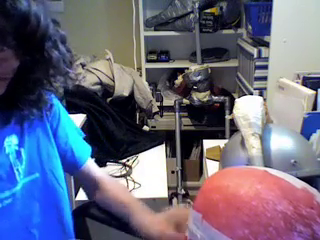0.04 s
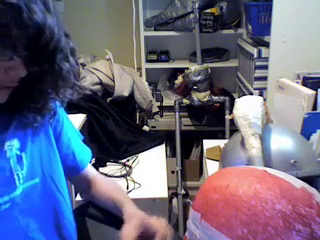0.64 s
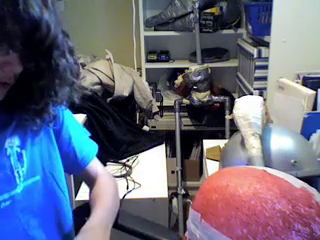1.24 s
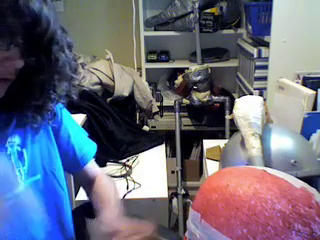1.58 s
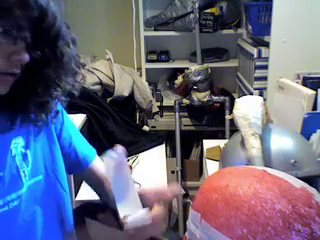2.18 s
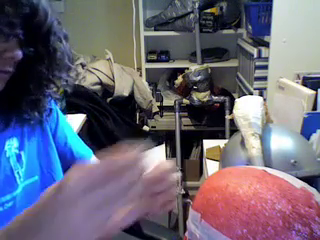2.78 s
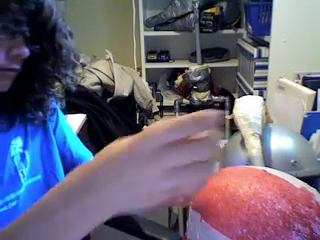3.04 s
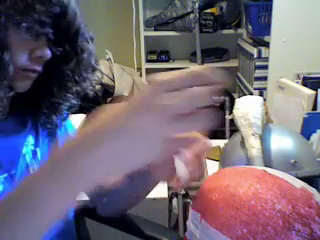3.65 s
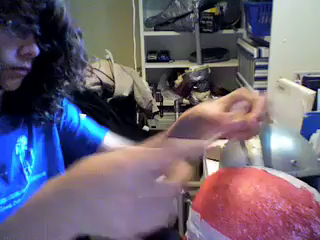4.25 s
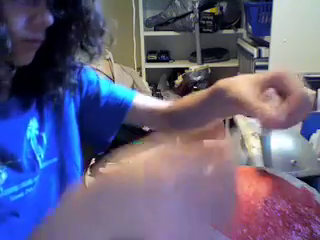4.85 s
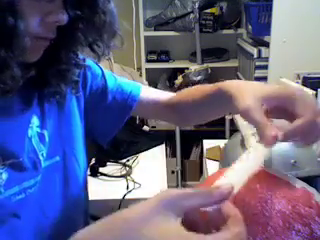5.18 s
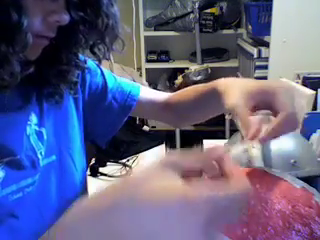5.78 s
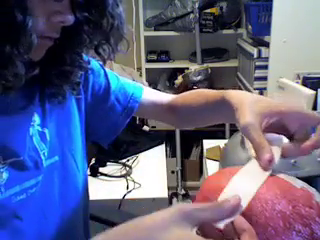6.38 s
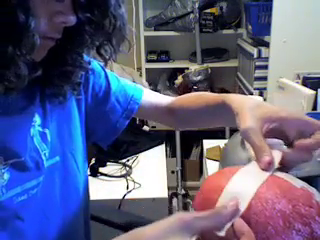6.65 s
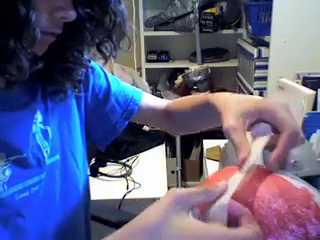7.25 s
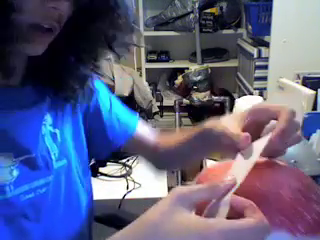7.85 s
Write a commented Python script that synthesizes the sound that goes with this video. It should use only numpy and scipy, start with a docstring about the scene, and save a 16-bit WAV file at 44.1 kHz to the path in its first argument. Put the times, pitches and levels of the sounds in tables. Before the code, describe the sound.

Short crackly rips of masking tape, a double knock on a desk, then soft paper rustling and dull bumps over faint hum.

```python
"""Masking tape for a tape ball

Tape crackles and squeals off its roll as the glue lets go, and is torn. The roll knocks twice on a desk,
which rings. The strip rustles as it is handled and pressed onto a large taped ball, which thumps softly.
The small room has a mains hum; the computer microphone hisses and adds a faint pulsing whine."""
import sys
import numpy as np
from scipy import signal
from scipy.fft import rfft, irfft
from scipy.io import wavfile
from scipy.ndimage import uniform_filter1d

SR = 44100
rng = np.random.default_rng(int(sys.argv[2]) if len(sys.argv) > 2 else 0)


def inscribe(sig):
    """Save sig as 16-bit PCM at rate SR to the path in sys.argv[1].

    A 1-D sig is mono; a 2-D sig holds one channel per row.
    Samples are clipped to [-1, 1] before scaling.
    """
    pcm = np.round(np.clip(np.atleast_2d(sig).T, -1, 1) * 32767)
    wavfile.write(sys.argv[1], SR, pcm.astype(np.int16))


N = 353285
TIME = np.arange(N) / SR


def amp(db):
    """Turns decibels into a number to multiply by."""
    return 10 ** (np.asarray(db) / 20)


def evened(x):
    """Scales a signal to an average strength (rms) of 1."""
    return x / np.sqrt(np.mean(x ** 2) + 1e-20)


def read(points, hz):
    """Reads between (frequency, value) points, on a scale of octaves."""
    f, value = np.transpose(points)
    return np.interp(np.log(hz + 1), np.log(f + 1), value)


def add(mix, s, sound):
    """Mixes a sound in at s seconds."""
    part = mix[..., max(round(s * SR), 0):][..., :sound.shape[-1]]
    part += sound[..., :part.shape[-1]]


def coloured_click(points, size=4096):
    """A click with the given tone colour and an energy of 1, packed at its start (minimum phase)."""
    log_gain = np.log(amp(read(points, abs(np.fft.fftfreq(size, 1 / SR)))))
    response = np.fft.ifft(np.exp(np.conj(signal.hilbert(log_gain)))).real[:size // 2]
    return response / np.linalg.norm(response)


def soften(x, hz):
    """Turns down everything above hz."""
    return signal.sosfilt(signal.butter(2, min(hz, SR / 3), fs=SR, output="sos"), x)


def waver(hz, size=N):
    """A smooth random curve that moves up to about hz times a second."""
    return evened(soften(rng.standard_normal(size), hz))


def flutter(hz, depth_db):
    """A volume that wavers at random."""
    return evened(amp(depth_db * waver(hz)))


def crackle(per_s, spread_db):
    """Tiny random clicks of unequal size."""
    size = amp(spread_db * np.minimum(rng.exponential(1, N), 4))
    return evened(size * rng.choice([-1, 1], N) * (rng.random(N) < per_s / SR))


def ringing_noise(hz, width_hz, size=N):
    """A wavering ring around one pitch."""
    wander = soften(rng.standard_normal(size) + 1j * rng.standard_normal(size), width_hz / 2)
    return evened((wander * np.exp(2j * np.pi * hz * TIME[:size])).real)


def background(air_db=-52.5, frames_per_s=14.98, on_share=0.41):
    """Room air, mains hum, and a slightly unsteady whine that pulses with every camera frame."""
    # tone colour of room air and microphone hiss: (frequency [Hz], relative level [dB])
    air_colour = [(20, -16), (38, 1), (55, -26), (100, 2.5), (200, 3), (400, 1.5), (1000, -3), (2000, -9.5),
                  (3600, -20.5), (4600, -22.5), (6300, -18), (8500, -21.5), (12000, -23.5), (15200, -31)]
    # hum of the mains power: (frequency [Hz], level [dB])
    hum_tones = [(59.6, -61), (119.7, -53), (239.5, -70.5)]
    # whine of the electronics: (frequency [Hz], level while on [dB], share that pulses [0-1])
    whine_tones = [(8000, -61, .97), (12947, -81, .9), (11052, -87, .5), (15250, -84, .1)]
    air_gain = amp(read(air_colour, np.fft.rfftfreq(N, 1 / SR)))
    air = amp(air_db) * evened(irfft(rfft(rng.standard_normal(N)) * air_gain, N))
    hum = sum(amp(db) * np.sqrt(2) * np.sin(2 * np.pi * (hz * TIME + rng.random()))
              for hz, db in hum_tones)
    frame = (TIME - .0271) * frames_per_s
    is_on = abs((frame + .5) % 1 - .5) < on_share / 2
    gate = uniform_filter1d(1. * is_on, size=60)
    drift = .2 * waver(7)
    whine = sum(amp(db) * np.sqrt(2) * (1 - share * (1 - gate)) * np.sin(2 * np.pi * hz * TIME + drift)
                for hz, db, share in whine_tones)
    return air * flutter(hz=2.7, depth_db=0.23) + hum * flutter(hz=1.9, depth_db=0.86) + whine


def room(x, echo_db, first_echo_s=0.00407):
    """The walls add a blur of echoes, in which each pitch dies away at its own speed."""
    # how long the room rings: (frequency [Hz], time to fade by 60 dB [s])
    fade_times = [(100, 0.21), (500, 0.29), (1500, 0.31), (6000, 0.24), (10000, 0.23), (15000, 0.13)]
    t = TIME[:SR // 2]
    echoes = rng.standard_normal(len(t)) * (t > first_echo_s)
    hz, when, bands = signal.stft(echoes, SR, nperseg=256)
    fade = amp(-60 * when / read(fade_times, hz)[:, None])
    tail = signal.istft(bands * fade, SR, nperseg=256)[1]
    return x + amp(echo_db) * signal.fftconvolve(x, tail / np.linalg.norm(tail))[:N]


def widen(mid):
    """Makes stereo: left and right differ a little, mostly in the treble."""
    # stereo width: (frequency [Hz], side level compared with the middle [dB])
    width = [(100, -68), (1200, -65), (2800, -52), (5600, -15), (10000, -9), (14000, -6.5)]
    hz = np.fft.rfftfreq(N, 1 / SR)
    knots = np.linspace(0, SR / 2, num=500)
    phase = .9 * np.interp(hz, knots, rng.standard_normal(len(knots))) - np.pi / 2
    side = irfft(rfft(mid) * amp(read(width, hz)) * np.exp(1j * phase), N)
    return np.array([mid + side, mid - side])


def thumps():
    """Hands bump the ball and the roll; such soft pushes ring only their lowest tones."""
    # the bumps: (time [s], peak level [dB], length of the push [s])
    bumps = [(0.113, -49, 0.0048), (0.223, -32, 0.002), (0.466, -41, 0.0048), (0.642, -35, 0.0032),
             (0.671, -30.5, 0.0012), (0.85, -45, 0.0029), (6.665, -40.5, 0.0044), (7.184, -41, 0.0047),
             (7.435, -30, 0.0041), (7.683, -39.5, 0.0049), (7.858, -25.5, 0.0013)]
    # their hollow boom: (frequency [Hz], relative level [dB], time to fade by 60 dB [s])
    boom_tones = [(62.6, -16, 0.18), (96, -4.5, 0.21), (148.6, 3.5, 0.47), (168, -33, 0.26),
                  (266, -1, 0.115), (322, -15, 0.13)]
    out, t = np.zeros(N), TIME[:SR // 2]
    boom = sum(amp(db - 60 * t / fade_s) * np.cos(2 * np.pi * hz * t) for hz, db, fade_s in boom_tones)
    for s, db, push_s in bumps:
        thump = signal.fftconvolve(boom, t * np.exp(-4 * t / push_s))[:len(t)]
        add(out, s, amp(db) * thump / abs(thump).max())
    return out


def wobble():
    """The cardboard roll wobbles on its rim between the two knocks."""
    # loudness of the rolling rim: (time [s], level [dB])
    loudness = [(2.1, -41), (2.135, -61), (2.165, -40), (2.19, -49), (2.21, -69)]
    s, db = np.transpose(loudness)
    return ringing_noise(hz=850, width_hz=450) * np.interp(TIME, s, amp(db), left=0, right=0)


def band_gains(body_db, sizzle_db):
    """Gains for paper(): the low body and the high sizzle, each compared with the middle band."""
    return amp([[body_db], [0], [sizzle_db]])


def paper(clicks, body_hz=3700, sizzle_hz=9000, size=2048):
    """Three rows of clicks sound the paper's low body, its middle crackle and its high sizzle."""
    # tone colour of crackling paper: (frequency [Hz], relative level [dB])
    paper_colour = [(60, -29), (140, 2), (220, -25.5), (350, -7), (600, -7.5), (1150, -4.5), (1700, -7.5),
                    (2400, -7.5), (3500, -10), (4500, -2.5), (5700, 6), (7500, -1), (11000, -18.5),
                    (15500, -29.5)]
    hz = np.fft.rfftfreq(2 * size, 1 / SR)
    body = 1 / (1 + (hz / body_hz) ** 10)
    sizzle = 1 / (1 + (sizzle_hz / (hz + 1)) ** 10)
    colour = rfft(np.pad(coloured_click(paper_colour), (size, 0)))
    bands = irfft(colour * np.array([body, 1 - body - sizzle, sizzle]))
    bands /= np.linalg.norm(bands, axis=1, keepdims=True)
    return signal.oaconvolve(clicks, bands, axes=1).sum(0)[size:size + N]


def knocks(ring_db=-19.5, blow_db=9, clatter_db=2, clatter_s=0.014, tick_s=0.0017):
    """The roll hits the desk with a tick and a brief clatter; where it lands shapes the desk's ring."""
    # the roll lands: (time [s], force [dB], hardness as a treble limit [Hz], place on the desk [0-1],
    # tick level [dB], crack of the rim compared with the tick [dB])
    landings = [(2.0542, 3, 1010, 0.12, -26, 1), (2.2108, -10, 1270, 0.15, -38, 14),
                (2.2132, 3.5, 2050, 0.2, -25.5, 13)]
    # first echoes from nearby surfaces: (delay [s], relative level [dB])
    echoes = [(.0024, -17), (.0049, -7), (.0075, -3), (0.0107, -8), (0.015, -27), (0.024, -20),
              (.0275, -11), (.031, -20)]
    # dull clunk of roll and desk top: (frequency [Hz], relative level [dB])
    clunk_colour = [(30, -38), (60, -5), (130, -11), (195, -4), (280, 3.5), (900, 2.5), (1500, -1),
                    (1850, -7), (2150, -18), (3100, -14), (4200, -23), (9000, -34)]
    # the desk's own tones: (frequency [Hz], relative level [dB], time to fade by 60 dB [s])
    desk_tones = [(57.5, -21, 0.26), (92, -7, 0.15), (141, -3, 0.22), (164, -9, 0.28), (248.7, -15.5, 0.33),
                  (296.5, -1.5, 0.14), (334, -7.5, 0.21), (400.7, -0.5, 0.15), (425.5, -4.5, 0.11),
                  (553.4, -5, 0.11), (654, 2, 0.11), (705, 4.5, 0.061), (830, 3, 0.064), (907, -4, 0.13),
                  (964, -9, 0.16), (1010, -2, 0.091), (1090, -1.5, 0.11), (1270, -13, 0.083),
                  (1550, -20, 0.077), (1650, -10, 0.046), (1903, -8, .07), (2940, 1.5, 0.022)]
    out, ticks, t = np.zeros(N), np.zeros((3, N)), TIME[:SR // 2]
    blow = np.zeros(len(t))
    for delay, db in [(0, 0), *echoes]:
        add(blow, delay, np.array([-amp(blow_db + db)]))
    clatter = rng.standard_normal(len(t)) * np.exp(-t / clatter_s)
    force = blow + amp(clatter_db) * clatter / np.linalg.norm(clatter)
    clunk = signal.fftconvolve(force, coloured_click(clunk_colour))[:len(t)]
    tones = np.array([amp(db - 60 * t / fade_s) * np.sin(2 * np.pi * hz * t)
                      for hz, db, fade_s in desk_tones])
    index = np.arange(len(desk_tones))
    for s, db, hard_hz, place, tick_db, crack_db in landings:
        weights = (-1) ** index * (1 + 0.41 * np.cos(2 * np.pi * index * place))
        add(out, s, amp(db) * soften(clunk + amp(ring_db) * weights @ tones, hard_hz))
        tick = rng.choice([-1, 1], len(t)) * np.exp(-t / tick_s)
        add(ticks, s, amp(tick_db) * band_gains(crack_db, sizzle_db=-15) * tick)
    return out + paper(ticks)


def rustle(grip_db=-78, crinkle_db=-7.5, rise_share=0.28, fade_share=0.67):
    """Sliding fingers rub a soft, grainy swish out of the crepe paper and set off small crinkles."""
    # finger strokes along the strip: (start [s], length [s], level [dB])
    strokes = [(0.01, 0.54, -52.5), (.7, 0.29, -64.5), (0.876, 0.11, -48), (1.109, 0.028, -53.5),
               (1.367, 0.21, -57.5), (1.613, 0.16, -49), (1.712, 0.42, -58), (2.034, 0.27, -55),
               (2.51, 0.1, -57), (2.608, 0.13, -50.5), (2.725, 0.18, -58.5), (2.874, 0.31, -64),
               (3.064, 0.26, -62), (3.282, 0.43, -68.5), (3.567, 0.29, -65.5), (3.857, 0.31, -63.5),
               (4.04, 0.29, -58.5), (4.315, 0.088, -52.5), (4.683, 0.78, -68.5), (4.956, 0.14, -49.5),
               (5.12, .07, -57), (5.324, 0.061, -50), (5.827, 0.13, -57.5), (6.628, 0.14, -62),
               (7.088, 0.16, -47), (7.185, .22, -54), (7.415, 0.15, -56), (7.573, 0.093, -54.5),
               (7.809, 0.15, -54.5)]
    rub = np.full(N, amp(grip_db))  # the held strip never quite rests
    for s, length, db in strokes:
        progress = np.arange(0, 1, 1 / (length * SR))
        swell = np.minimum(progress / rise_share, (1 - progress) / fade_share)
        add(rub, s, amp(db) * np.clip(swell, 0, 1))
    swish = band_gains(body_db=-7, sizzle_db=-9) * crackle(per_s=6000, spread_db=2.5)
    swish *= flutter(hz=50, depth_db=2.0)
    crinkles = band_gains(body_db=-3, sizzle_db=-9) * crackle(per_s=45, spread_db=2.5)
    return rub * (swish + amp(crinkle_db) * crinkles)


def snaps(rise_s=0.0013, echo_db=-16, echo_s=0.021, lowest_hz=560):
    """Each snap is a quick cluster of tiny breaks, its sound scattered by the hands and desk."""
    # creases snap and glue lets go: (time [s], level [dB], relative body [dB], relative sizzle [dB])
    breaks = [(0.0732, -41.5, -11, -27), (.1631, -19.5, -11, -15), (0.2341, -31, 9.5, -14),
              (0.393, -50.5, 7, -19), (0.556, -43, -22, -14), (0.596, -40, 7, -11), (0.643, -43, -4, -6),
              (.681, -48, -13, -15), (0.943, -36, -1.5, -17), (1.277, -41, -12, -34),
              (1.641, -42, -3.5, -25), (1.6734, -15.5, -20.5, -30), (1.6862, -28, -20, -21),
              (1.935, -39, -8, -14), (2.8122, -44.5, -4, -24), (3.2122, -44.5, -4, -8),
              (4.1995, -39, -4.5, -13), (4.2128, -41, 1.5, -11), (4.352, -41, -3.5, -8),
              (5.1583, -51, 3, 3), (5.1958, -47.5, -4, -20), (5.333, -48.5, 7.5, -3),
              (5.3923, -43, -10, -16), (5.941, -48, -12, -14), (6.7467, -52, -3, -23),
              (6.8876, -47, 4, -2.5), (6.9611, -41, 3, -4), (6.966, -30.5, -9, -2.5),
              (7.1198, -36, -10, -7), (7.1344, -36.5, -9, -1), (7.144, -38, -8, 1),
              (7.1511, -37.5, 0.5, -4), (7.251, -43.5, -2, -7), (7.2857, -41.5, 3.5, 0),
              (7.3189, -34, -5, -5.5), (7.348, -42, -15, -12), (7.3576, -31.5, -9, -6),
              (7.3688, -40, -3, -2), (7.3926, -31.5, -1, 7.5), (7.3984, -22.5, -6.5, -16),
              (7.567, -46, -3.5, -21), (7.6845, -48, -2, -8), (7.8554, -39, -1.5, -5.5)]
    clicks, t = np.zeros((3, N)), TIME[:2500]
    shape = t / rise_s * np.exp(1 - t / rise_s) + amp(echo_db) * np.exp(-t / echo_s)
    for s, db, body, sizzle in breaks:
        burst = rng.choice([-1, 1], len(t)) * shape
        add(clicks, s, amp(db) * band_gains(body, sizzle) * burst)
    # so small a patch of paper gives off little bass
    return signal.sosfilt(signal.butter(2, lowest_hz, "highpass", fs=SR, output="sos"), clicks)


def twangs():
    """The tight strip rings or squeaks as it is jerked."""
    # rings of the strip: (time [s], pitch [Hz], pitch spread [Hz], level [dB], fade time [s])
    jerks = [(.114, 2870, 1090, -34, 0.099), (.174, 1282, 250, -34, 0.067), (0.233, 657, 403, -28, 0.011),
             (1.675, 5640, 350, -24, 0.029), (1.671, 2730, 700, -29.5, 0.011),
             (2.707, 1660, 400, -43.5, 0.0057), (5.142, 2170, 244, -47, 0.01),
             (7.401, 1304, 1100, -26.5, 0.0069)]
    out, t = np.zeros(N), TIME[:SR // 4]
    for s, hz, width_hz, db, fade_s in jerks:
        fade = np.exp(-(t / fade_s) ** 1.5)
        ring = ringing_noise(hz, width_hz, size=len(t)) * fade
        add(out, s, amp(db) * ring * np.linalg.norm(fade) / np.linalg.norm(ring))
    return out


def squeal(jitter=0.1, overtone_db=-8, sink_octaves_per_s=10.8):
    """The glue sticks and slips in short fits, sinking in pitch as the free strip grows longer."""
    # fits of squealing: (start [s], length [s], starting pitch [Hz], level [dB])
    fits = [(0.098, 0.037, 3900, -39.5), (0.141, 0.018, 1370, -26.5), (0.172, 0.013, 457, -29),
            (0.193, 0.037, 360, -37.5)]
    out = np.zeros(N)
    unsteady = 1 + jitter * waver(580)
    for s, length, start_hz, db in fits:
        t = np.arange(0, length, 1 / SR)
        hz = start_hz * 2 ** (-sink_octaves_per_s * t) * unsteady[round(s * SR):][:len(t)]
        phase = 2 * np.pi * np.cumsum(hz) / SR
        slips = sum(amp(overtone_db * k) * np.sin((k + 1) * phase) for k in range(3))
        add(out, s, amp(db) * np.sin(np.pi * t / length) * evened(slips))
    return out


def pulls(rasp=0.46, start_hz=3100, end_hz=190, slowing_s=0.027):
    """Glue threads and fibres break by the thousand, in slips that slow as the free strip lengthens."""
    # tape peels off the roll: (start [s], rise [s], hold [s], fade [s], level [dB],
    # relative body [dB], relative sizzle [dB])
    peels = [(0.108, 0.019, 0.11, .015, -27.5, -7, -10.5), (.552, .002, 0.049, 0.049, -48, -2.5, -8),
             (0.632, 0.018, 0.005, 0.034, -30.5, -2, -6.5),
             (1.665, 0.0079, 0.0027, 0.019, -24.5, -14.5, -11.5)]
    strength, t = np.zeros((3, N)), TIME[:SR // 3]
    slip_hz = end_hz + (start_hz - end_hz) * np.exp(-t / slowing_s)
    for s, rise, hold, fade, db, body, sizzle in peels:
        speed = np.minimum(t / rise, 1) * np.exp(-(np.maximum(t - rise - hold, 0) / fade) ** 2)
        unsteady = 1 + 0.196 * waver(289, len(t))
        slips = evened(1 + rasp * np.cos(2 * np.pi * np.cumsum(slip_hz * unsteady) / SR))
        add(strength, s, speed * slips * amp(db) * band_gains(body, sizzle))
    return strength * crackle(per_s=6500, spread_db=2.6) * flutter(hz=200, depth_db=0.45)


def scene():
    """Tape, desk and ball in one small room, nearly mono."""
    tape = paper(pulls() + rustle() + snaps()) + squeal() + twangs()
    desk = knocks() + wobble()
    in_room = room(tape, echo_db=-10.5) + room(desk, echo_db=-13.0) + room(thumps(), echo_db=-7)
    return widen(in_room + background())


def record(dry, ceiling=0.9, top_hz=15500):
    """The microphone rounds off the hardest peaks; then the highest treble is cut."""
    rounded = dry / (1 + (dry / ceiling) ** 8) ** (1 / 8)
    treble_cut = signal.firwin(255, top_hz, window=("kaiser", 9), fs=SR)
    return signal.oaconvolve(rounded, treble_cut[None], "same")


dry = scene()
out = record(dry)
inscribe(out)
```